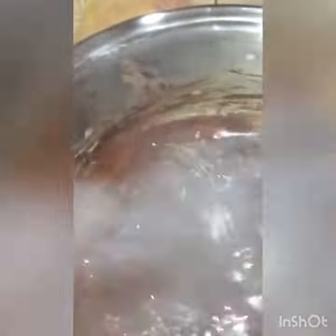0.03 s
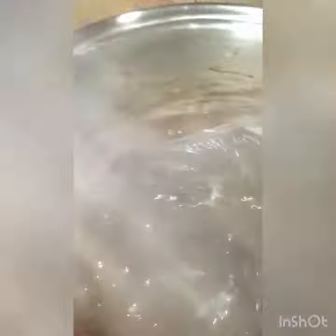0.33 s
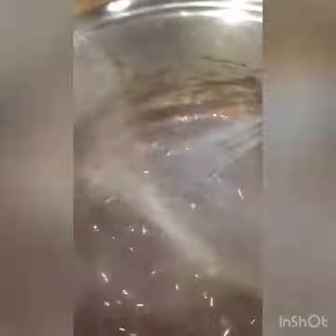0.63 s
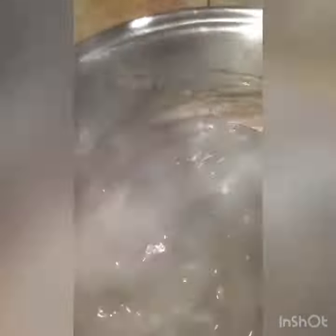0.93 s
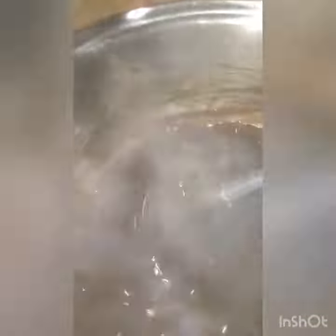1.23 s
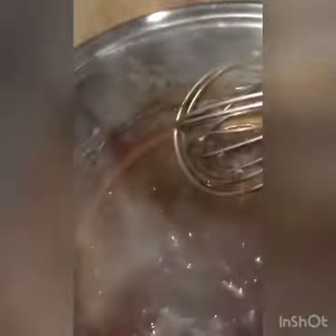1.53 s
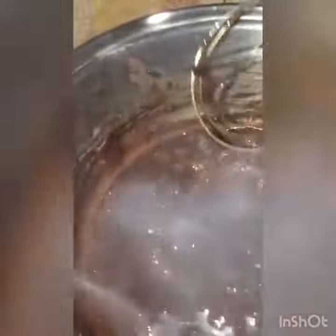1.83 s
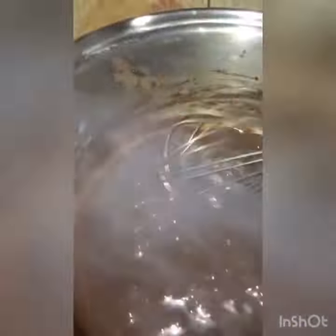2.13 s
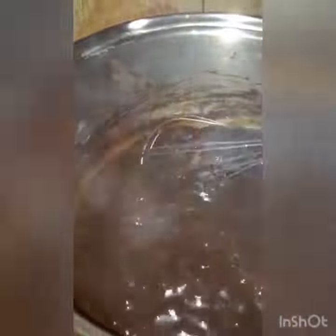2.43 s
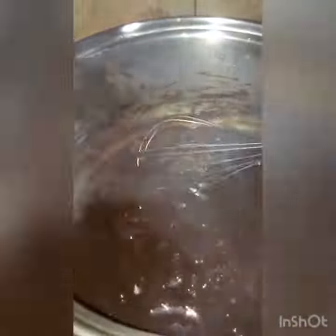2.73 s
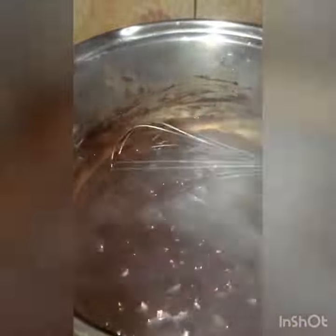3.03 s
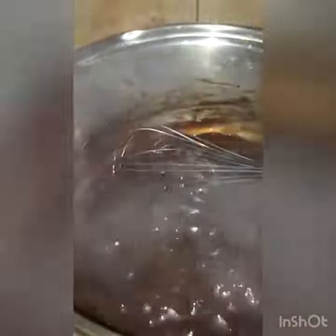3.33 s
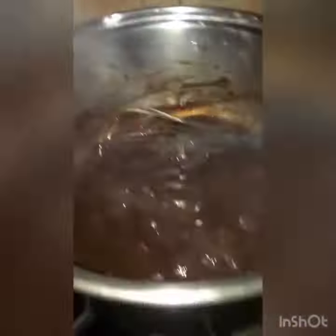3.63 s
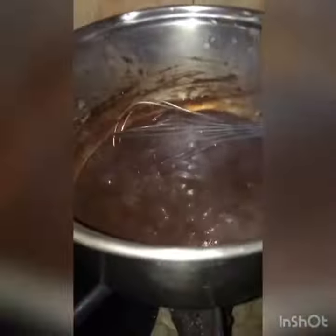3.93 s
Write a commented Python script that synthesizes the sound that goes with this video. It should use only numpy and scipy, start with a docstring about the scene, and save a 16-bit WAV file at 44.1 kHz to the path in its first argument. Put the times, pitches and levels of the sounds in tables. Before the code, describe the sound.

Close up in a small kitchen, a metal whisk stirs a filled pot with bright clinks and scraping. It stops and knocks to rest, leaving small syrup bubbles popping over the burner's soft hiss.

```python
"""A wire whisk clinks and scrapes round a steel pot of boiling syrup, then is set down with a few knocks.
Each blow rings the wires, wall and rim; between blows the wires catch, slip and rub the bottom.
The filled pot rings in soft, low notes; tiny bursting bubbles tick over the burner's hiss and rumble.
A small kitchen, one close microphone."""
import sys
import numpy as np
from scipy import signal
from scipy.fft import rfft, irfft, next_fast_len
from scipy.io import wavfile
from scipy.ndimage import uniform_filter1d, map_coordinates

SR = 44100
rng = np.random.default_rng(int(sys.argv[2]) if len(sys.argv) > 2 else 0)


def transcribe(signal):
    """Save signal, clipped to [-1, 1], as a 16-bit WAV file at the path in sys.argv[1]."""
    frames = np.atleast_2d(signal).T
    limited = np.clip(frames, -1, 1)
    pcm = np.round(limited * 32767).astype(np.int16)
    wavfile.write(sys.argv[1], SR, pcm)


N = 176400

# start_s, clink_db, knock_db, boom_db, rim_db, clank_db, clank_hz
CONTACTS = [(0.0384, -21.5, -31, -63, -44, -37.5, 274), (.203, -60, -31, -48, -49, -37.5, 1377),
            (.295, -67, -39, -47, -66, -40, 330), (0.317, -65, -39, -64, -63, -41, 1038),
            (0.488, -70, -44, -43, -67, -40.5, 1447), (0.6872, -21, -45, -62, -60, -38, 315),
            (0.6936, -26, -39, -34, -48, -43, 1374), (0.7041, -31, -35, -38, -50, -32, 539),
            (0.7613, -60, -31.5, -56, -43, -33.5, 1374), (.775, -60, -37, -66, -53, -44, 1060),
            (0.9851, -17, -54, -52, -64, -35, 1315), (0.9916, -22, -29.5, -26, -35, -34.5, 493),
            (1.051, -58, -32, -61, -62, -34.5, 786), (1.289, -54, -43, -38.5, -55, -40.5, 1017),
            (2.194, -57.5, -55, -70, -58.5, -55, 3580), (2.2721, -33.5, -34.5, -39, -47, -34, 1035),
            (2.722, -50.5, -34.5, -36.5, -36, -35.5, 1314), (2.8334, -36, -40, -43, -43.5, -53, 2860),
            (2.8734, -43.5, -43, -37.5, -47.5, -37, 1038), (3.673, -68, -52, -72, -65, -55, 1374)]
# spectra: freq_hz, level_db
CLINK_SPECTRUM = [(60, -34), (300, -35), (2500, -14), (4200, -20), (5500, -13.5), (6200, -1), (8200, -3),
                  (10000, -6), (12500, -11), (16000, -19)]
KNOCK_SPECTRUM = [(40, -43), (120, -4), (220, -3), (380, 1.5), (560, -7.5), (720, -1.5), (920, -3),
                  (1080, -4), (1200, -2.5), (1400, -0.5), (1900, -4.5), (2700, -9.5), (3500, -12),
                  (6000, -17.5), (12000, -43)]
# modes: pitch_hz, level_db, t60_s
WIRE_MODES = [(5230, -8, .13), (5990, -5, .15), (6790, -4, .08), (7003, 0, .14), (7440, 0, .12),
              (8168, 1, .13), (8282, 0, .13), (9068, -3, .11), (10720, -2, .08), (11884, -6, .1)]
POT_MODES = [(341, -6.5, .16), (441, -4, .13), (544, 0, .15), (621, -6, .15), (813, -9, .16),
             (923, -9, .16), (1042, -10, .17), (1305, -12, .13), (1428, -11, .13), (1746, -16, .13)]
RIM_MODES = [(3900, -9, .22), (4118, -1, .105), (4334, -9, .1), (4500, -3, .09), (5270, -6, .11),
             (5950, -4, .09)]
# modes of the struck spot: pitch_ratio, level_db, t60_s
CLANK_MODES = [(1, 0, .1), (.923, -5, .13), (1.1, -8, .06)]

def whisk_contacts():
    """Each blow rattles the wires, knocks the wall and rings the struck spot, the filled pot and its rim."""
    out, t = np.zeros(N), np.arange(SR // 2) / SR
    for start_s, clink_db, knock_db, boom_db, rim_db, clank_db, clank_hz in CONTACTS:
        clink = colour(steel_ripple(noise(len(t))), CLINK_SPECTRUM)
        clink *= decay(t, t60_s=0.052) + amp(-15) * decay(t, t60_s=0.051)
        clink += amp(-19) * ring(WIRE_MODES, t)
        knock = colour(noise(len(t)), KNOCK_SPECTRUM) * decay(t, t60_s=0.057)
        clank = ring([(ratio * clank_hz, db, t60_s) for ratio, db, t60_s in CLANK_MODES], t)
        boom = ring(POT_MODES, t) * attack(t, rise_s=0.0065)
        rim = ring(RIM_MODES, t)
        rim += amp(-8) * band(noise(len(t)), centre_hz=4500, width_oct=0.25) * decay(t, t60_s=0.11)
        blow = amp(clink_db) * clink + amp(knock_db) * knock + amp(clank_db) * clank
        blow += amp(boom_db) * boom + amp(rim_db) * rim
        add(out, start_s, blow * attack(t, rise_s=0.00053))
    return out


def steel_ripple(x, depth_db=3.8):
    """The steel's many close resonances ripple the spectrum at random."""
    ripple_db = depth_db * noise(300)
    knots_hz = np.linspace(0, SR / 2, len(ripple_db))
    return filtered(x, lambda hz: amp(np.interp(hz, knots_hz, ripple_db)))


# strokes on the wall: time_s, level_db
SCRAPE_LEVELS = [(0, -37), (.03, -45.5), (.09, -43), (.17, -41.5), (.22, -44.5), (.26, -43), (.38, -44.5),
                 (.44, -42), (.56, -44), (.67, -43), (.73, -44), (.78, -49.5), (.82, -40), (.87, -48.5),
                 (.95, -41), (1.0, -43.5), (1.08, -49), (1.105, -41), (1.17, -47.5), (1.235, -52),
                 (1.28, -45.5), (1.32, -62), (1.38, -67)]
# wire on steel: freq_hz, level_db
SQUEAL_SPECTRUM = [(2000, -2.5), (2700, -2.5), (3400, -5.5), (3950, -10), (4120, -1), (4350, -16),
                   (5000, -9), (5320, -1), (5600, -17), (5980, 5), (6600, -0.5), (8000, -0.5),
                   (12300, -5.5), (15500, -9)]

def stirring(mode_width_hz=49, release_db_per_s=89):
    """The wires scrape round the pot, sounding their own modes and the rim's, until the whisk is lifted."""
    def friction():
        rasp = patchy_noise(depth_db=3, width_bins=7)
        return rasp * amp(1.2 * wobble(rate_hz=30) + 2.2 * wobble(rate_hz=400))

    peaks = [(hz, mode_width_hz, db + 1.5) for hz, db, _ in RIM_MODES]
    peaks += [(hz, mode_width_hz, db) for hz, db, _ in WIRE_MODES]
    scrape = unit(colour(friction(), SQUEAL_SPECTRUM) + amp(-9) * resonances(friction(), peaks))
    stroke = envelope(SCRAPE_LEVELS)
    # harder strokes chatter more, so sound brighter
    chatter = amp(-1) * (stroke / stroke.max()) ** 0.91 * wire_chatter()
    lifted_s = np.maximum(np.arange(N) / SR - SCRAPE_LEVELS[-1][0], 0)
    return amp(-release_db_per_s * lifted_s) * (stroke * (scrape + chatter) + bottom_drag())


def wire_chatter(rate_per_s=2000, centre_hz=10200, span_oct=1.0, spread_db=8):
    """Single wires catch on the wall and slip free, each with a brief ring; rms 1."""
    out, t = np.zeros(N), np.arange(SR // 80) / SR
    fade = decay(t, t60_s=0.014)
    for when, pitch, louder, softer in rng.random((int(rate_per_s * N / SR), 4)):
        hz = centre_hz * 2 ** (span_oct * (pitch - .5))
        gain = amp(spread_db * (louder - softer))
        add(out, when * N / SR, gain * fade * np.sin(2 * np.pi * hz * t))
    return unit(out)


# strokes on the bottom: time_s, level_db
DRAG_LEVELS = [(0, -47.5), (.15, -48), (.4, -46), (.46, -44), (.53, -44.5), (.6, -52.5), (.8, -41.5),
               (.87, -49.5), (.91, -42.5), (.97, -46.5), (1.1, -47.5), (1.22, -51.5), (1.3, -54),
               (1.36, -63)]
# bottom friction: freq_hz, level_db
BOTTOM_SPECTRUM = [(30, -38), (90, -24), (170, -4), (260, 5), (350, -1), (600, 2), (1000, 6.5), (1400, 1.5),
                   (2000, -12.5), (3000, -18.5), (6000, -19)]

def bottom_drag():
    """Uneven friction on the bottom, partly ringing in the pot's modes."""
    def slips():
        return patchy_noise(depth_db=1.2) * amp(1.8 * wobble(rate_hz=90))

    peaks = [(hz, np.log(1000) / (np.pi * t60_s), db) for hz, db, t60_s in POT_MODES]
    rub = amp(-5.5) * colour(slips(), BOTTOM_SPECTRUM)
    body = amp(-2.5) * resonances(slips(), peaks)
    return envelope(DRAG_LEVELS) * (rub + body)


# lightly touched rim: pitch_hz, width_hz, level_db
SLIDE_PEAKS = [(3560, 100, -9), (3900, 70, 0), (4750, 160, -7), (5260, 110, -4), (5950, 160, -7)]

def whisk_settling(start_s=2.85, length_s=0.27):
    """The whisk slides to rest, rubbing the bottom and lightly sounding the rim."""
    progress = np.clip((np.arange(N) / SR - start_s) / length_s, 0, 1)
    arch = 2 * np.sqrt(progress * (1 - progress)) * (1 - progress / 2)
    slide = arch * amp(-56 + 2.9 * wobble(rate_hz=29.3))
    rub = amp(-1.5) * colour(noise(), BOTTOM_SPECTRUM)
    scrape = amp(-16) * colour(noise(), SQUEAL_SPECTRUM)
    rim = amp(-4) * resonances(noise(), SLIDE_PEAKS)
    return slide * (rub + scrape + rim)


# start_s, level_db, pitch_hz
POT_NOTES = [(.215, -38, 336), (.46, -40.5, 646), (.495, -34, 339.4), (.525, -37.5, 620), (0.537, -37, 313),
             (.775, -36, 334), (.902, -50, 728), (0.928, -43, 326), (1.139, -39.5, 328.6),
             (1.183, -42.5, 327), (2.491, -54.5, 840), (2.529, -51.5, 997)]

def pot_notes(glide_per_s=0.95, t60_s=0.13):
    """Soft, low, slightly rising notes of the filled pot ringing as it is stirred."""
    out, t = np.zeros(N), np.arange(SR // 5) / SR
    for start_s, level_db, pitch_hz in POT_NOTES:
        note = ring([(pitch_hz, level_db, t60_s)], t + glide_per_s * t ** 2 / 2)
        add(out, start_s, 2 * note * attack(t, rise_s=0.011))
    return out


# louder bursts: start_s, level_db, pitch_hz
POPS = [(1.362, -47, 4200), (1.392, -49, 7500), (1.439, -39, 12800), (1.9753, -48, 5500),
        (2.0102, -41.5, 6100), (2.0477, -37.5, 10400), (2.4413, -38, 6300), (2.461, -35, 9700),
        (2.517, -41, 10300), (2.617, -52, 4230), (2.661, -40, 9780), (2.694, -36, 8200), (2.781, -29, 8200),
        (2.794, -35, 11000), (3.231, -48, 5700), (3.3137, -38.5, 9500), (3.3575, -44, 9680),
        (3.391, -38.5, 10800), (3.416, -38.5, 10600), (3.6635, -43, 5700), (3.693, -39, 10900),
        (3.722, -41, 8800), (3.726, -35, 11800), (3.803, -44, 13400), (3.651, -45, 12800),
        (3.509, -49, 9500), (3.7628, -41, 13000), (3.768, -45, 5660), (3.8321, -42, 6000),
        (3.855, -45, 12500), (3.8907, -42, 10900)]

def boiling(fizz_per_s=53, fizz_hz=10400, fizz_span_oct=2, ping_cycles=3.6):
    """Tiny bubbles burst as pings of a few cycles: some loud ones over a fine random fizz."""
    out, t = np.zeros(N), np.arange(256) / SR
    fizz = []
    for when, rank, pitch in rng.random((int(fizz_per_s * N / SR), 3)):
        level_db = -57.5 - 3.5 * np.log(rank + 0.035)
        fizz.append((when * N / SR, level_db, fizz_hz * 2 ** (fizz_span_oct * (pitch - .5))))
    for start_s, level_db, pitch_hz in POPS + fizz:
        age = np.pi * t * pitch_hz / ping_cycles
        ping = age * np.exp(1 - age) * np.sin(2 * np.pi * pitch_hz * t)
        add(out, start_s, amp(level_db + 0.5) * ping)
    return out


# spectra: freq_hz, level_db
HISS_SPECTRUM = [(200, -13.5), (330, 2.5), (450, 4), (700, 1), (1400, -0.5), (1700, -1.5), (1950, 4),
                 (2350, 4.5), (2600, -3), (2800, 1.5), (3200, -7.5), (4500, -16), (8000, -18.5),
                 (12000, -17), (16000, -26)]
RUMBLE_SPECTRUM = [(20, -48), (32, -27), (43, -1.5), (58, -13.5), (75, 4.5), (100, -18), (125, -20.5),
                   (152, -4.5), (200, -20), (400, -54.5)]
# time_s, gain_db
RUMBLE_SWELL = [(0, 7), (1.1, 5), (1.55, 3), (1.9, 0), (2.3, -2), (2.9, 6), (3.3, -1.5), (4, -1)]
# notes in the hiss: pitch_hz, width_hz, level_db
WHISTLE_PEAKS = [(1850, 18, -6), (1975, 18, -3), (2520, 18, -3), (2575, 20, 0), (2630, 18, -3)]

def burner(hum_hz=142.5, hum_width_hz=25):
    """The burner hisses, whistles faintly and rumbles; the pot hums briefly as the stirring stops."""
    hiss = amp(-57 + 0.54 * wobble(rate_hz=20)) * colour(patchy_noise(depth_db=1.5), HISS_SPECTRUM)
    rumble = amp(-57.5) * envelope(RUMBLE_SWELL) * colour(noise(), RUMBLE_SPECTRUM)
    hum = unit(filtered(noise(), lambda hz: np.exp(-((hz - hum_hz) / hum_width_hz) ** 2)))
    hum *= envelope([(1.18, -80), (1.26, -52.5), (1.5, -55), (1.7, -66), (1.9, -100)])
    whistle = amp(-61.5) * resonances(noise(), WHISTLE_PEAKS)
    return hiss + whistle + rumble + hum


def kitchen_reverb(x):
    """The small room's reflections merge into a short tail."""
    t = np.arange(SR // 3) / SR
    tail = noise(len(t)) * decay(t, t60_s=0.33) * attack(t, rise_s=0.0039)
    return signal.fftconvolve(x, tail / np.linalg.norm(tail))[:N]


def ring(modes, t, drift_rad=0.51, drift_rate_hz=62):
    """Damped modes, varying from blow to blow and blurred by phase drift."""
    out = np.zeros(len(t))
    for hz, db, t60_s in modes:
        fade = amp(db + rng.normal(0, 1.0)) * decay(t, t60_s)
        phase = 2 * np.pi * (hz * t + rng.random())
        drift = drift_rad * np.interp(t * drift_rate_hz, np.arange(200), noise(200))
        out += fade * np.sin(phase + drift)
    return out


def resonances(x, peaks):
    """x through (pitch_hz, width_hz, level_db) resonators of alternating sign; rms 1."""
    def response(f):
        return sum((-1) ** k * amp(db) * 1j * f * width / (hz * hz - f * f + 1j * f * width)
                   for k, (hz, width, db) in enumerate(peaks))

    return unit(filtered(x, response))


def patchy_noise(depth_db, width_bins=5):
    """Noise whose bands come and go."""
    spectra = signal.stft(noise(), nperseg=512)[2]
    patches = uniform_filter1d(noise(spectra.shape), size=width_bins, axis=0)
    patches = uniform_filter1d(patches, size=9, axis=1)
    return signal.istft(spectra * amp(depth_db * unit(patches)), nperseg=512)[1][:N]


def colour(x, spectrum):
    """x shaped by (freq_hz, level_db) points; rms 1."""
    freq_hz, level_db = np.transpose(spectrum)
    return unit(filtered(x, lambda hz: amp(np.interp(np.log(hz + 1), np.log(freq_hz), level_db))))


def band(x, centre_hz, width_oct):
    """A bell-shaped band of x; rms 1."""
    return unit(filtered(x, lambda hz: np.exp(-(np.log2((hz + 1) / centre_hz) / width_oct) ** 2)))


def filtered(x, response):
    """x through a frequency response."""
    size = next_fast_len(len(x) + 8192)
    return irfft(rfft(x, size) * response(np.fft.rfftfreq(size, 1 / SR)), size)[:len(x)]


def envelope(points):
    """Gain per sample from (time_s, level_db) points."""
    return amp(np.interp(np.arange(N) / SR, *np.transpose(points)))


def wobble(rate_hz):
    """A smooth curve through random knots."""
    return map_coordinates(noise(4000), [np.arange(N) * rate_hz / SR], mode="wrap")


def noise(shape=N):
    return rng.standard_normal(shape)


def attack(t, rise_s):
    return 1 - np.exp(-t / rise_s)


def decay(t, t60_s):
    return amp(-60 * t / t60_s)


def amp(db):
    return 10 ** (np.asarray(db) / 20)


def unit(x):
    """Scale to rms 1."""
    return x / np.sqrt(np.mean(x ** 2) + 1e-20)


def add(out, start_s, x):
    """Mix x into out."""
    part = out[max(0, round(start_s * SR)):][:len(x)]
    part += x[:len(part)]


def scene():
    """One microphone feeds both channels; blows, bubbles and pot notes get a weak room tail."""
    hits = whisk_contacts() + boiling() + pot_notes()
    mono = hits + amp(-9.5) * kitchen_reverb(hits) + stirring() + whisk_settling() + burner()
    return np.array([mono, mono])


def record(dry):
    """Brick-wall low-pass."""
    cutoff_hz = 15850
    return np.array([filtered(x, lambda hz: hz < cutoff_hz) for x in dry])


dry = scene()
out = record(dry)
transcribe(out)
```